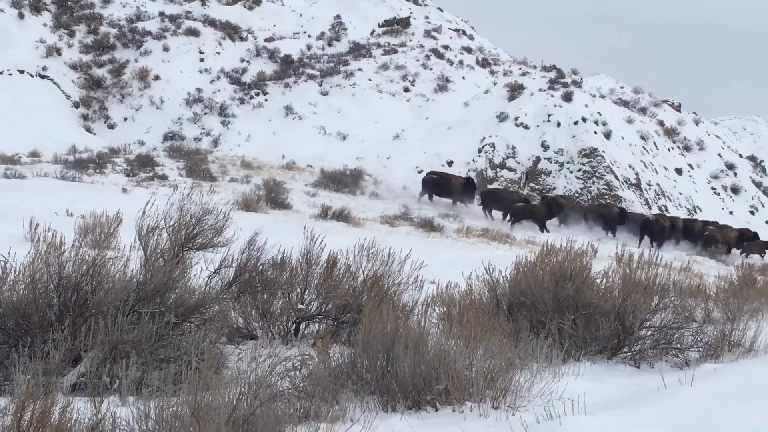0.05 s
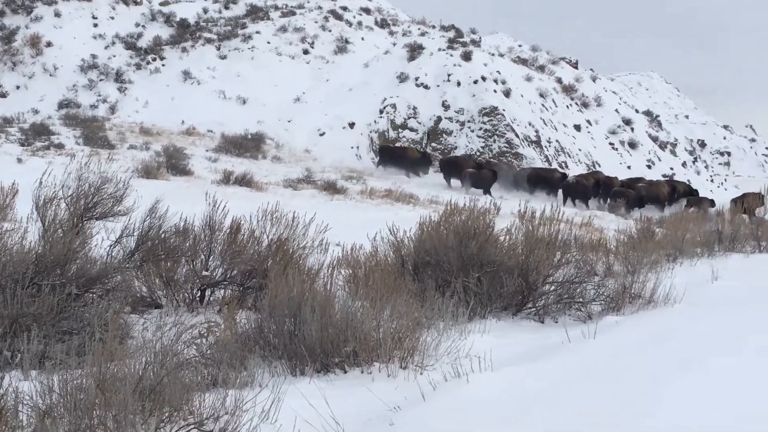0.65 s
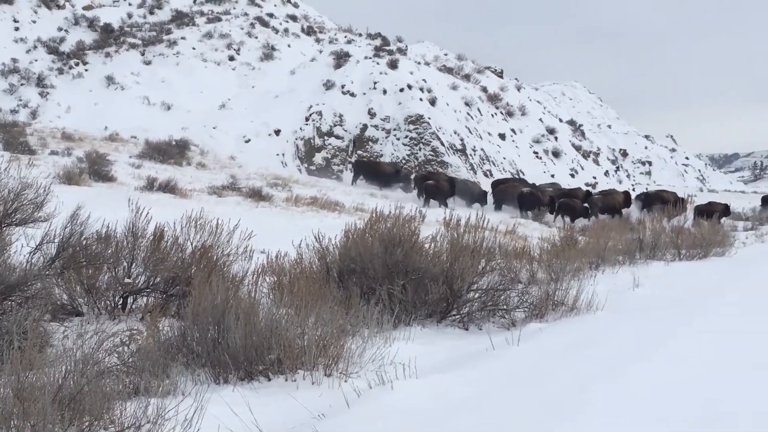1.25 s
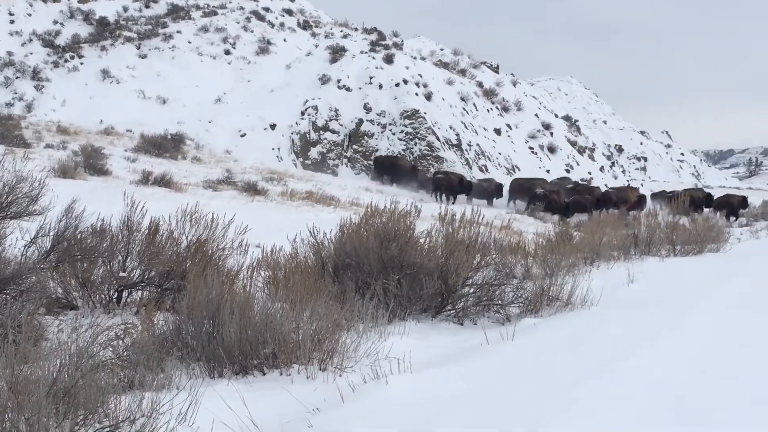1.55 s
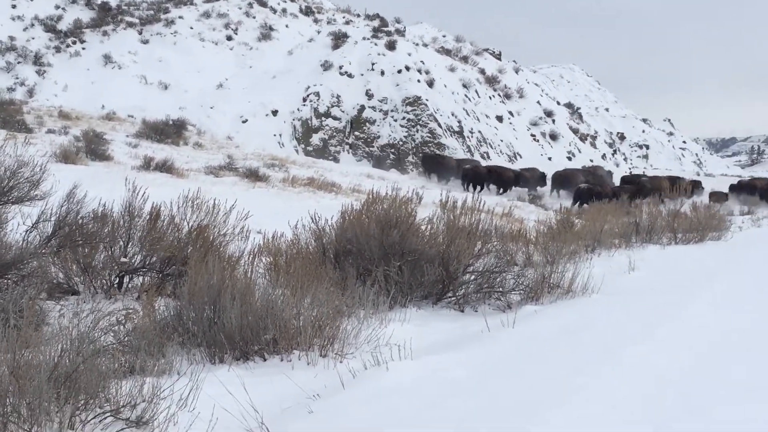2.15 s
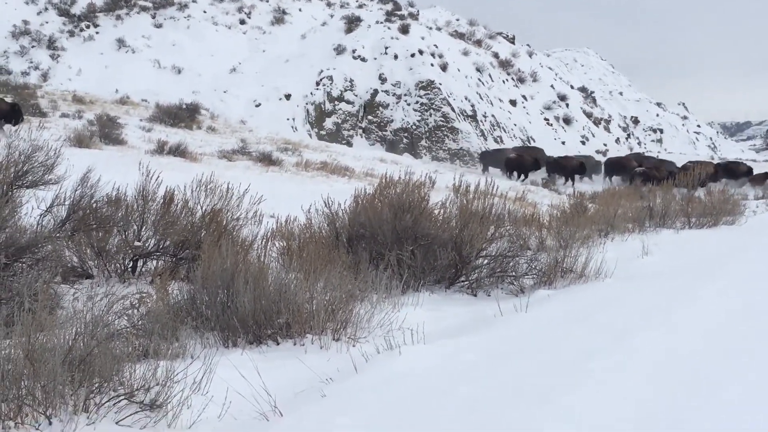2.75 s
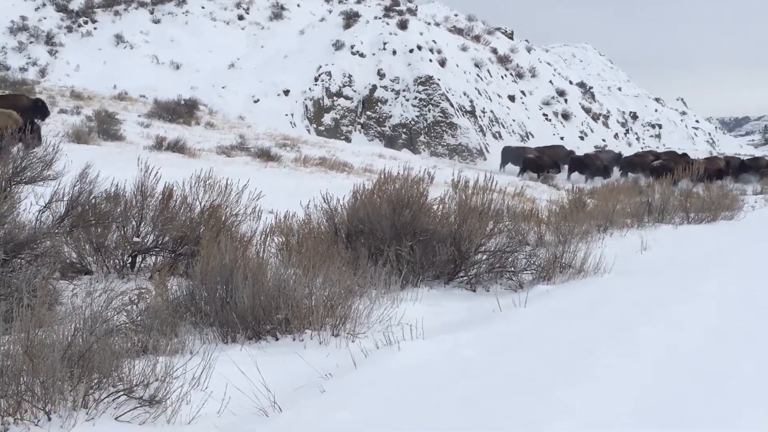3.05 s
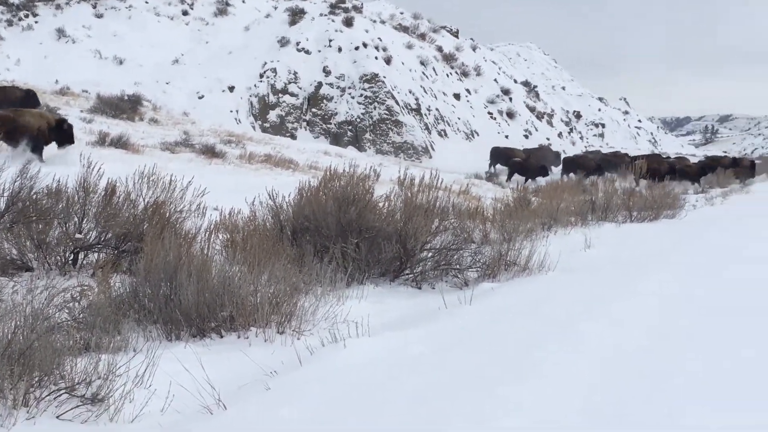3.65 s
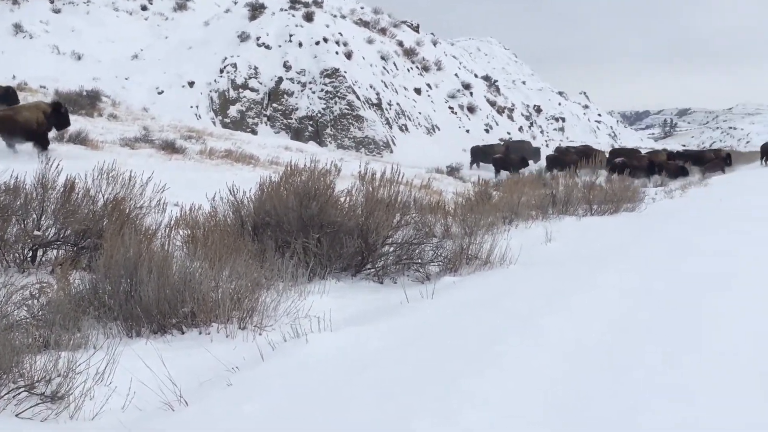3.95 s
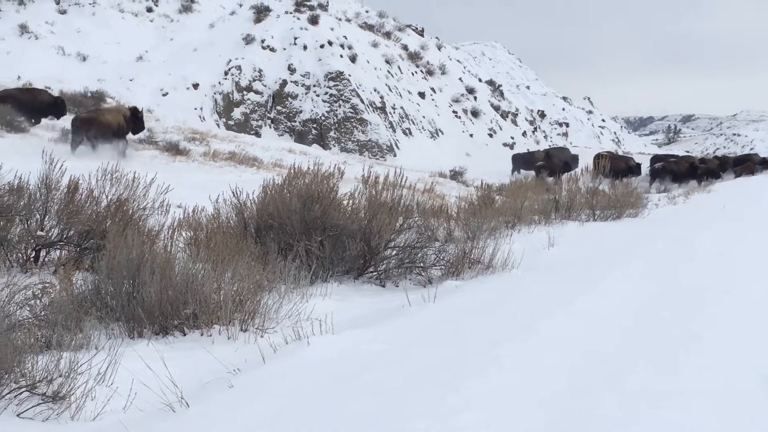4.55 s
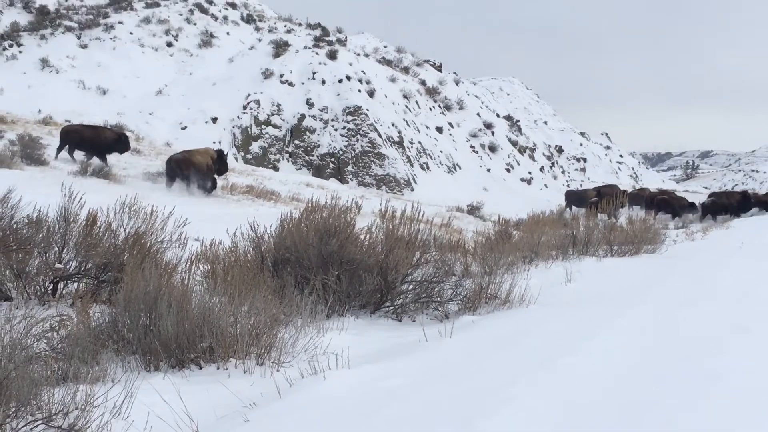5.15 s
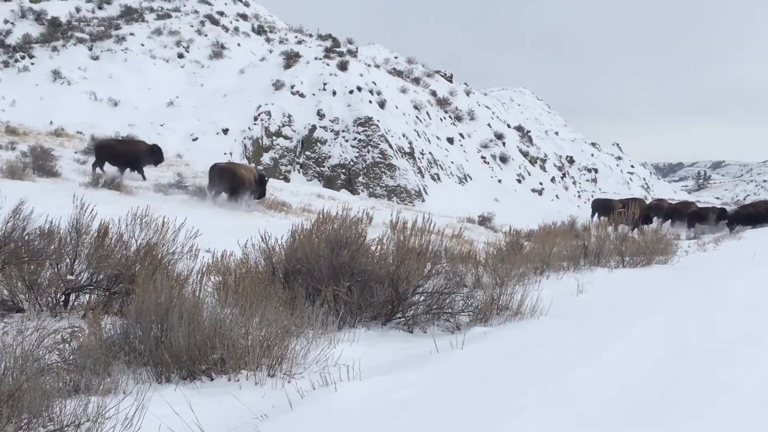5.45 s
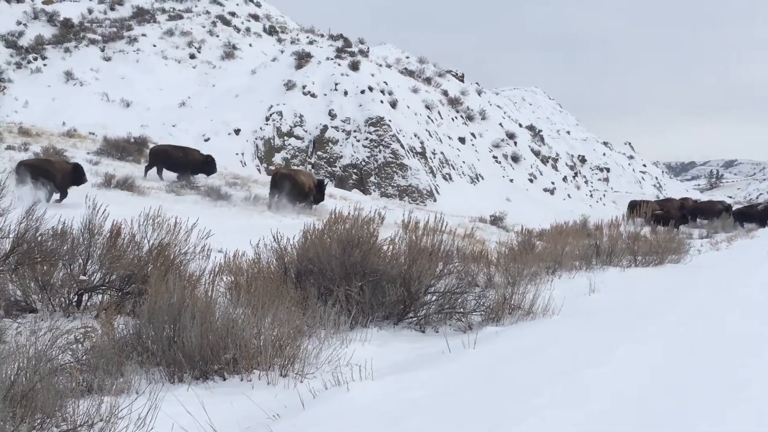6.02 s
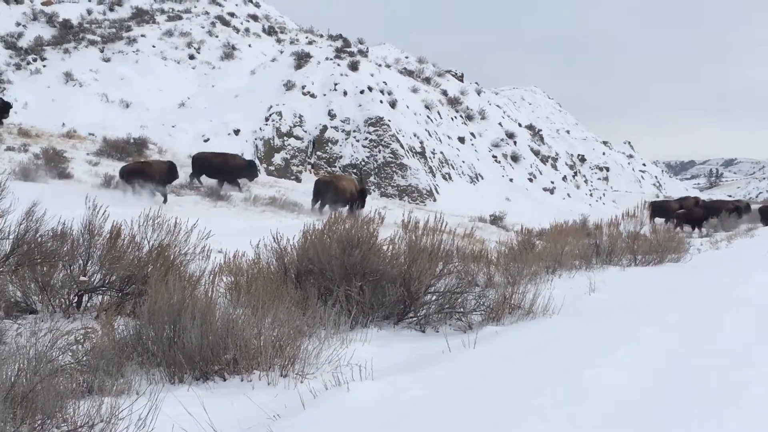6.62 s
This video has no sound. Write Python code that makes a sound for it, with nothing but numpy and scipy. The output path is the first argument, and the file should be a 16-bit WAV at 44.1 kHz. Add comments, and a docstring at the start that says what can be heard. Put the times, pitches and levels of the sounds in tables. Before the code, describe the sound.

Light wind buffets a hand-held microphone on an open snowy hillside for about seven seconds, a low, lumpy rumble with brief soft thumps and short lulls. Far quieter beneath it run an even hiss, a fine crackle of snow crust and twigs, and the dull hum of a vehicle idling nearby. From the start to about 2.4 seconds, a winter jacket swishes close to the microphone, with thin, bright ticks of fabric and zip and slight scuffs of the grip. From about 3.2 seconds, small snaps of dry stems come more often. The strongest gust arrives near 4.9 seconds. From about 5.6 seconds the treble turns slightly hollow as a finger nears the microphone, and the fabric ticks return, with the sharpest at about 6.7 seconds. The wind carries on to the end, and nothing echoes.

```python
"""Light wind on a snowy hillside buffets a hand-held microphone from the start, each eddy one low pressure
swing. Beneath it the slope hisses, crust and twigs crackle and a vehicle idles faintly close by.
For the first 2.4 s winter clothing often swishes and ticks by stick-slip friction. From 3.2 s dry stems
snap more often, and near 4.9 s the strongest gust arrives. From 5.6 s a finger slides up to the
microphone port and colours the treble; the sharpest tick falls near 6.7 s. The soft snow gives no echo."""
import sys
import numpy as np
from scipy import signal
from scipy.fft import rfft, irfft, next_fast_len
from scipy.io import wavfile
from scipy.ndimage import uniform_filter1d

SR = 44100
rng = np.random.default_rng(int(sys.argv[2]) if len(sys.argv) > 2 else 0)


def unload_wav(signal):
    """Save mono or channel-first audio to the path in sys.argv[1] as 16-bit WAV at rate SR, clipped to [-1, 1]."""
    wavfile.write(
        sys.argv[1],
        SR,
        np.round(np.clip(np.atleast_2d(signal).T, -1, 1) * 32767).astype(np.int16),
    )


N = 303408

# Levels in all tables are relative: each source applies its own gain.
# Spectra of the slope's hiss, the engine's drone, the sleeve's swish and scrape, and the wind's rumble.
# Each row: frequency in Hz, spectral density in dB.
HISS_SPECTRUM = [(300, 8.5), (550, 3.5), (760, -2.5), (1150, -0.5), (1500, -2.5), (1950, -3.5), (2400, -10),
                 (2900, -19), (3600, -16.5), (5000, -21.5), (9000, -21), (16000, -26.5)]
DRONE_SPECTRUM = [(60, 8.5), (150, -9), (240, 0.5), (300, -5.5), (380, -6.5), (450, -28), (600, -17.5),
                  (900, -32.5)]
SWISH_SPECTRUM = [(3500, -26), (5000, -12.5), (6700, -1.5), (9300, -1.5), (11700, -4), (13500, -6),
                  (15500, -9)]
SCRAPE_SPECTRUM = [(2000, -17), (2800, -11), (3300, -2), (4200, -14.5), (5000, -8), (7000, -9)]
RUMBLE_SPECTRUM = [(15, -36), (28, -18.5), (42, 1.4), (56, 4.5), (80, -3), (110, -5), (160, -16.5),
                   (250, -36.5), (400, -35.5), (1000, -62)]
# Course of the slope's hiss. Each row: time in seconds, level in dB.
HISS_LEVEL = [(0, -62), (.6, -61), (.95, -59.5), (1.5, -61), (2.3, -62.5), (2.55, -61), (2.9, -62.5),
              (3.6, -60.5), (4.3, -62.5), (5.5, -63), (6.1, -63.5), (6.88, -62.5)]
# Spectral lines of the engine and its fan. Each row: frequency in Hz, level in dB, line width in Hz.
HUM_LINES = [(284.8, -58, 7.6), (556, -76.5, 13), (665, -73, 13), (876, -80.5, 14), (948, -80.5, 14),
             (1140, -78.5, 16), (1231, -79.5, 14), (1840, -80.5, 18)]
# The hum fades and returns. Each row: time in seconds, gain in dB.
HUM_LEVEL = [(0, -2.5), (.2, -14.5), (.4, 0.5), (1.55, -4), (1.73, -6), (1.9, 0), (4.3, 1), (4.8, -1.5),
             (5.2, 0.5), (5.7, 0), (6.1, -1.5), (6.3, 1.5), (6.88, 1.5)]
# Snaps of dry stems and, at 6.676 s, the lower body of the loud fabric tick.
# Each row: start in seconds, crack level in dB, crack centre in Hz, knock level in dB.
SNAPS = [(0.071, -47.5, 1500, -43), (0.597, -45, 1800, -46), (1.791, -55, 3200, -56),
         (2.035, -49, 2000, -42), (3.222, -51, 2400, -50), (3.226, -55, 1600, -45), (3.263, -56, 2900, -58),
         (3.501, -51, 1600, -47), (3.6982, -42.5, 3620, -43.5), (3.755, -46.5, 2860, -48),
         (3.894, -56, 4200, -62), (4.144, -53, 2690, -52), (4.236, -52, 2300, -50), (4.591, -50, 4000, -58),
         (4.657, -51, 2300, -60), (4.747, -47.5, 2200, -52), (4.904, -47, 2060, -52),
         (5.071, -52, 2300, -49), (5.159, -46, 1900, -54), (5.386, -51.5, 2400, -60),
         (5.607, -50, 2570, -58), (5.625, -51.5, 4200, -64), (5.689, -48, 2080, -55),
         (5.726, -62, 3800, -67), (5.831, -48, 1600, -47), (6.192, -52, 2400, -61), (6.349, -52, 2200, -55),
         (6.556, -53, 1400, -44), (6.676, -42, 3500, -50), (6.793, -55.5, 3800, -68)]
# Modes of a typical stem. Each row: frequency in Hz, level in dB, 60 dB decay time in seconds.
STEM_MODES = [(730, -3, 0.011), (1320, -3, 0.017), (2000, -7, 0.011)]
# Scuffs of the grip. Each row: middle in seconds, level in dB, length in seconds, centre in Hz,
# bandwidth in octaves.
SCUFFS = [(0.1, -57, 0.02, 517, 1.0), (0.625, -65, 0.068, 1690, 0.39), (0.959, -67.5, 0.045, 3500, 0.59),
          (1.648, -70, 0.043, 3300, 0.5), (2.037, -58, 0.013, 1250, 1), (3.508, -65, 0.017, 1250, 0.89),
          (3.59, -71, 0.09, 2600, 0.83), (4.071, -74, 0.14, 3360, 0.37), (4.594, -60, 0.025, 1550, 0.45),
          (4.587, -65.5, 0.039, 4700, 0.92), (5.276, -59, 0.0095, 980, 0.45),
          (6.345, -60, 0.022, 1000, 0.9), (6.702, -54, 0.012, 820, 0.7), (6.73, -57.5, 0.04, 905, 0.67)]
# Faint rustle of a jacket that never quite rests. Each row: time in seconds, level in dB.
RUSTLE_LEVEL = [(0, -74), (.7, -74), (1.5, -76), (2.2, -73), (2.7, -78.5), (4.1, -76), (4.35, -80.5),
                (5.9, -80), (6.2, -73), (6.88, -78)]
# Sleeve strokes. Each row: start in seconds, length in seconds, level in dB, brightness in dB.
STROKES = [(0.304, 0.1, -64.5, -11), (0.527, 0.2, -62, -10), (0.7, 0.015, -73, 1), (0.753, 0.13, -69, 2),
           (1.02, 0.11, -66.5, -0.5), (1.176, .03, -72, 6), (1.378, 0.023, -67, -2),
           (1.543, 0.025, -68.5, 3), (1.636, 0.028, -60, -1.5), (1.731, 0.068, -59.5, -0.5),
           (1.968, 0.08, -68, 1), (2.1, 0.15, -70, -3), (2.318, 0.011, -59, 1), (3.35, 0.04, -68, 3.5),
           (3.564, 0.125, -67, 0), (4.443, 0.12, -77, 9), (4.62, 0.15, -72, -1), (4.557, 0.046, -64.5, -8),
           (6.273, 0.024, -64, -12), (6.5, 0.04, -72, 0), (6.673, 0.021, -65, -1), (6.858, 0.04, -74, -1)]
# Ticks of fabric and zip. Each row: start in seconds, level in dB, centre in Hz, 60 dB decay in seconds.
TICKS = [(0.517, -37, 8930, 0.0081), (0.566, -37, 9450, .004), (0.5745, -26, 11800, 0.0042),
         (0.705, -42, 12000, .005), (0.775, -40, 11500, .005), (0.7925, -48, 9000, .004),
         (1.005, -48, 12000, .005), (1.03, -44, 10500, .008), (1.037, -47, 9000, .008),
         (1.072, -43, 11000, .02), (1.094, -44, 12000, .01), (1.384, -38.5, 9220, .008),
         (1.39, -40, 12000, .008), (1.545, -46, 10000, .02), (1.6355, -29, 6400, 0.0064),
         (1.7445, -35, 9800, .008), (1.762, -46, 12000, .004), (1.7867, -38, 7330, .025),
         (1.791, -35, 6500, .006), (2.1635, -44, 7630, .005), (2.2895, -46, 7000, .004),
         (2.3225, -40, 12500, .006), (2.3284, -30.5, 7600, .004), (3.5523, -41, 7000, .01),
         (5.1871, -41.5, 7850, 0.017), (5.406, -48, 12000, .015), (5.42, -50, 10000, .015),
         (5.5287, -43.5, 8480, 0.011), (6.0307, -38.5, 8760, .01), (6.081, -44.5, 8550, 0.03),
         (6.116, -45, 10500, .03), (6.2696, -47, 6700, .02), (6.279, -46, 8000, .015),
         (6.2916, -41.5, 7090, .02), (6.5, -53, 9000, .015), (6.573, -44, 8500, .006),
         (6.647, -36.5, 9820, .008), (6.6757, -24, 7600, 0.0097), (6.6784, -31, 8500, .005),
         (6.754, -43, 8950, .012), (6.8224, -46, 12000, .006), (6.8633, -43, 10000, .008)]
# Gusts over the steady wind. Each row: middle in seconds, level in dB, length in seconds.
GUSTS = [(0.254, -43.5, 0.53), (0.796, -39, 0.099), (1.304, -39.5, 0.083), (1.51, -39, 0.18),
         (1.79, -44.5, 0.093), (2.593, -39.5, 0.08), (3.003, -43.5, 0.22), (4.006, -39.5, 0.11),
         (4.906, -35, 0.17), (5.2, -39, 0.06), (6, -43.5, 0.32), (6.83, -39.5, 0.09)]
# Drops in the steady wind. Each row: middle in seconds, depth in dB, length in seconds.
LULLS = [(0.68, -13, 0.04), (1.102, -9, 0.15), (2.057, -12, 0.08), (3.17, -6.5, .14), (3.703, -1.5, 0.23),
         (4.228, -3, 0.032), (4.623, -8, 0.047), (4.758, -2, 0.054), (5.404, -7, 0.05), (6.39, -9, 0.2),
         (6.724, -9, 0.049)]
# The strongest eddies at the port. Each row: middle in seconds, level in dB, swing frequency in Hz.
EDDIES = [(0.015, -24.5, 64), (0.114, -34.5, 79), (0.168, -28, 60), (0.199, -33, 72.6), (0.243, -29.5, 67),
          (0.339, -30, 75.6), (0.765, -34, 63), (0.796, -40, 67), (1.303, -35, 66), (1.443, -29, 70),
          (1.492, -28.5, 76), (1.537, -24.5, 146), (1.556, -28.5, 81), (1.611, -36.5, 88.5),
          (1.775, -34, 79), (1.976, -33, 61.6), (2.147, -36, 69.4), (2.417, -30, 83), (2.589, -32, 83),
          (2.627, -28, 148), (2.905, -22.5, 74), (2.958, -37, 63), (3.063, -36, 83), (3.46, -34, 72),
          (3.989, -37, 77), (4.024, -32.5, 63), (4.142, -33.5, 140), (4.165, -24.5, 77.5),
          (4.269, -30.5, 70), (4.681, -34.5, 70), (4.824, -25, 60), (4.84, -35.5, 130), (4.865, -29, 70),
          (4.904, -22, 111), (4.991, -22, 54.4), (5.191, -28.5, 76), (5.28, -30, 97), (5.326, -28, 81.6),
          (5.748, -33, 92), (5.855, -33, 71), (5.889, -32.5, 72.5), (6.032, -32, 70.4), (6.064, -30.5, 84),
          (6.167, -34.5, 73.5), (6.752, -34.5, 80.6), (6.824, -29.5, 76)]
# Resonances and notches of the microphone port, and of the gap under a finger beside it.
# Each row: centre in Hz, bandwidth in Hz, gain in dB.
PORT_RESONANCES = [(4030, 710, 2.5), (5030, 410, -3.5), (7200, 280, -1), (7600, 1200, -2.5), (9500, 580, 0),
                   (10570, 770, -6), (10830, 610, 2), (11200, 760, 0), (15200, 830, 0.5)]
GAP_RESONANCES = [(2390, 230, 3.5), (4440, 430, 2.5), (5980, 680, -13), (7350, 550, 8.5), (8060, 700, -10),
                  (9400, 640, 7), (10400, 1600, -10), (11800, 500, 4), (15200, 7100, -3.5)]
# The finger nears the port. Each row: time in seconds, closeness from 0 to 1.
FINGER_CLOSENESS = [(0, 0.06), (5.6, 0.08), (6.05, 0.4), (6.6, 0.7), (6.88, 0.7)]


def from_db(db):
    """Amplitude ratio: tenfold for every 20 dB."""
    return 10 ** (np.asarray(db) / 20)


def rms_one(x):
    """Normalisation to unit rms."""
    return x / np.sqrt(np.mean(x ** 2) + 1e-20)


def in_time(rows):
    """Linear interpolation of (seconds, value) rows at every sample."""
    return np.interp(np.arange(N) / SR, *np.transpose(rows))


def swell(s, length):
    """Gaussian envelope of height 1 around time s."""
    return np.exp(-2 * np.minimum(((np.arange(N) / SR - s) / length) ** 2, 20))


def drift(rate_hz):
    """Slow random modulation: low-passed noise of unit rms."""
    step, settle = 40, 2000   # samples per point; points discarded while the filter settles
    pole = np.exp(-2 * np.pi * rate_hz * step / SR)
    noise = rng.standard_normal(N // step + settle + 2)
    slow = signal.lfilter([1], [1, -2 * pole, pole * pole], noise)[settle:]
    return np.interp(np.arange(N) / step, np.arange(len(slow)), rms_one(slow))


def colour(x, spectrum):
    """Spectral shaping of a steady signal, to unit rms."""
    hz, db = np.transpose(spectrum)
    size = next_fast_len(N)
    bins_hz = np.maximum(np.arange(size // 2 + 1) * SR / size, 1)
    gain = from_db(np.interp(np.log(bins_hz), np.log(hz), db, left=-90, right=-90))
    return rms_one(irfft(rfft(x, size) * gain, size)[:N])


def band(x, hz, octaves, order=2):
    """Causal band-pass filtering around a centre frequency."""
    edges = np.clip([hz / 2 ** (octaves / 2), hz * 2 ** (octaves / 2)], 10, .45 * SR)
    return signal.sosfilt(signal.butter(order, edges, "band", fs=SR, output="sos"), x)


def ring(x, hz, t60):
    """Damped oscillator: a unit impulse excites a decaying sine of height 1."""
    radius, angle = from_db(-60 / (t60 * SR)), 2 * np.pi * hz / SR
    return signal.lfilter([0, np.sin(angle)], [1, -2 * radius * np.cos(angle), radius ** 2], x + 1e-18)


def equalise(x, peaks):
    """Resonances and notches in series: their responses multiply."""
    for hz, width_hz, db in peaks:
        x = x + (from_db(db) - 1) * signal.lfilter(*signal.iirpeak(hz, hz / width_hz, fs=SR), x)
    return x


def add(out, s, sound):
    """Superposition of a sound on the output from time s."""
    start = int(round(s * SR))
    first, last = max(start, 0), min(start + len(sound), N)
    if last > first:
        out[first:last] += sound[first - start:last - start]


def impulses(per_s, spread_db, max_spreads):
    """Poisson process: independent impulses of uneven size and either sign."""
    sizes = from_db(spread_db * np.minimum(rng.exponential(1, N), max_spreads))
    return sizes * rng.choice([-1, 1], N) * (rng.random(N) < per_s / SR)


def friction(per_s, spread_db, grain_gain):
    """Stick-slip friction: fibres catch and let go, adding grains to a smooth hiss."""
    return grain_gain * rms_one(impulses(per_s, spread_db, max_spreads=4)) + rng.standard_normal(N)


def clicks(rows, gain_db, octaves, strike_db, tail_db, tail_t60, order):
    """Sudden release of stress: a sharp impulse, a decaying crack and a faint slither after it."""
    out, t = np.zeros(N), np.arange(SR // 10) / SR
    for s, db, hz, t60 in rows:
        decay = from_db(-60 * t / t60) + from_db(tail_db - 60 * t / tail_t60)
        force = np.sign(rng.standard_normal(len(t))) * decay
        force[0] = from_db(strike_db)
        crack = band(force, hz, octaves, order)
        peak_rms = np.sqrt(uniform_filter1d(crack ** 2, size=44, mode="constant").max())   # over 1 ms
        add(out, s, from_db(db + gain_db) * crack / peak_rms)
    return out


def slope_hiss(gain_db=2.0):
    """Broadband noise: the open slope and its dry brush give an even, finely grained hiss."""
    hiss = colour(friction(per_s=250, spread_db=2.5, grain_gain=0.49), HISS_SPECTRUM)
    return from_db(in_time(HISS_LEVEL) + gain_db) * hiss


def engine(drone_db=-52.0, drone_waver_db=1.2, hum_db=1.24, hum_waver_db=1.86, speed_wobble=0.00402):
    """Random modulation broadens the fan and belt lines over the dull drone of an idling engine."""
    running_time = np.cumsum(1 + speed_wobble * drift(4.01)) / SR   # the speed hunts a little
    hum = np.zeros(N)
    for hz, db, width_hz in HUM_LINES:
        sway = 1 + 1.15 * (drift(width_hz) + 1j * drift(width_hz))   # in amplitude and phase
        hum += from_db(db) * rms_one(np.real(sway * np.exp(2j * np.pi * hz * running_time)))
    drone = from_db(drone_db + drone_waver_db * drift(4.3)) * colour(rng.standard_normal(N), DRONE_SPECTRUM)
    return drone + from_db(hum_db + in_time(HUM_LEVEL) + hum_waver_db * drift(14)) * hum


def crust_crackle(rms_db=-71.5, low_hz=750, high_hz=4200, per_octave_db=-4.0, cycles=8.5):
    """Impulse excitation: each tiny break in crust or twig rings a few cycles; the higher, the fainter."""
    breaks = impulses(per_s=110, spread_db=2.5, max_spreads=3)
    pitches = np.geomspace(low_hz, high_hz, 16)
    pitch_index = rng.integers(0, len(pitches), N)
    grains = np.zeros(N)
    for k, hz in enumerate(pitches):
        gain = from_db(per_octave_db * np.log2(hz / low_hz))
        grains += gain * ring(breaks * (pitch_index == k), hz, t60=cycles / hz)
    return from_db(rms_db) * rms_one(band(grains, np.sqrt(low_hz * high_hz), octaves=2.8))


def snaps(crack_t60=0.0067, typical_crack_hz=2200, pitch_exponent=0.54, spread_octaves=0.13):
    """Modal ringing: a crack over a woody knock makes each stem's snap and the loud tick's lower body."""
    cracks = [(s, db, hz, crack_t60) for s, db, hz, _ in SNAPS]
    out = clicks(cracks, gain_db=-6.5, octaves=0.88, strike_db=5.5, tail_db=-16, tail_t60=0.046, order=2)
    impulse = signal.unit_impulse(SR // 20)
    for s, _, crack_hz, knock_db in SNAPS:
        detune = 2 ** (spread_octaves * rng.uniform(-1.2, 1))
        pitch = (crack_hz / typical_crack_hz) ** pitch_exponent * detune   # thin stems sound higher
        knock = sum(from_db(db) * ring(impulse, hz * pitch, t60) for hz, db, t60 in STEM_MODES)
        add(out, s, -from_db(knock_db) * knock)   # inverted so that it adds to the crack: a full snap
    return out


def grip_scuffs(rough_db=2.5, rough_hz=90):
    """Sliding friction: the shifting grip gives short swells of rough, stuttering noise."""
    out, t = np.zeros(N), np.arange(-SR // 5, SR // 5) / SR
    for s, db, length, hz, octaves in SCUFFS:
        rubbing = rms_one(band(rng.standard_normal(len(t)), hz, octaves))
        add(out, s + t[0], from_db(db) * np.exp(-2 * (t / length) ** 2) * rubbing)
    return out * rms_one(from_db(rough_db * drift(rough_hz)))


def crinkle(x, depth_db=3.0, rate_hz=35):
    """Amplitude modulation: folds catch one after another, so each treble band flickers on its own."""
    out = np.zeros(N)
    for hz in np.geomspace(5000, 13000, 6):
        low = signal.sosfiltfilt(signal.butter(4, hz, fs=SR, output="sos"), x)
        out += low * from_db(depth_db * drift(rate_hz))
        x = x - low
    return rms_one(out + x * from_db(depth_db * drift(rate_hz)))


def sleeve_power(attack_s=0.012, release_s=0.022, arch_db=3, rest_bright_db=-6.0):
    """Incoherent sounds add in power: rustle plus strokes, for the body and the top of the swish."""
    t = np.arange(N) / SR
    power = from_db(in_time(RUSTLE_LEVEL)) ** 2
    top_power = power * from_db(rest_bright_db) ** 2
    for s, length, db, brightness_db in STROKES:
        fade = np.maximum((s - t) / attack_s, (t - s - length) / release_s)
        arch = np.sin(np.pi * np.clip((t - s) / length, 0, 1))   # loudest in mid-stroke
        stroke = from_db(db + arch_db * (arch - 1.5)) * np.exp(-np.clip(fade, 0, 20))
        power += stroke ** 2
        top_power += (from_db(brightness_db) * stroke) ** 2
    return power, top_power


def sleeve(top_hz=10300, top_db=3.0, scrape_db=-3.5, scrape_exponent=0.51, flicker_db=2.0):
    """Friction of shell fabric: a swish, brighter on light strokes, and a scrape that grows with it."""
    power, top_power = sleeve_power()
    fibres = crinkle(colour(friction(per_s=520, spread_db=2.0, grain_gain=0.84), SWISH_SPECTRUM))
    body = signal.sosfiltfilt(signal.butter(3, top_hz, fs=SR, output="sos"), fibres)
    swish = np.sqrt(power) * body + from_db(top_db) * np.sqrt(top_power) * (fibres - body)
    scrape_level = np.sqrt(power.mean() * (power / power.mean()) ** scrape_exponent)
    scrape = scrape_level * colour(friction(per_s=370, spread_db=1.5, grain_gain=0.72), SCRAPE_SPECTRUM)
    return (swish + from_db(scrape_db) * scrape) * from_db(flicker_db * drift(24.0))


def fabric_ticks(faint_per_s=3, faint_hz=8200, faint_t60=0.25):
    """Transients: stiff fabric and zip catch and release, with fainter ticks at random times."""
    faint = []
    for when, size, pitch in rng.random((int(faint_per_s * N / SR), 3)):
        relative_db = -54 + 2.5 * (2 * size - 1)
        hz = faint_hz * 2 ** (0.7 * (2 * pitch - 1))   # within 0.7 octave either way
        faint.append((when * N / SR, relative_db, hz, faint_t60))
    rows = TICKS + faint
    return clicks(rows, gain_db=-14.0, octaves=0.7, strike_db=4.0, tail_db=-21, tail_t60=.08, order=1)


def wind_rumble(steady_db=-45, gain_db=1.5, lumpy_db=3.0, lumps_hz=13, power_floor=0.077):
    """Turbulent pressure at the port: a lumpy rumble that follows the gusts and lulls."""
    lull_db = sum(db * swell(s, length) for s, db, length in LULLS)
    gust_power = sum((from_db(db) * swell(s, length)) ** 2 for s, db, length in GUSTS)
    power = from_db(steady_db + lull_db) ** 2 + gust_power
    flow = colour(rng.standard_normal(N), RUMBLE_SPECTRUM)
    flow /= np.sqrt(uniform_filter1d(flow ** 2, size=3000) + power_floor)   # evens out chance swells
    lumps = drift(lumps_hz)
    lumps = rms_one(lumps - uniform_filter1d(lumps, size=8000))
    return np.sqrt(power) * from_db(gain_db + lumpy_db * np.minimum(lumps, 2)) * flow


def wind_eddies(swing_db=2.5, width_cycles=0.44, flutter_db=-23.5, flutter_s=0.012, per_octave_db=8.0):
    """A passing vortex is one brief pressure swing; the faster it is, the more it breaks into flutter."""
    out, t = np.zeros(N), np.arange(-SR // 20, SR // 20) / SR
    median_hz = np.median([hz for _, _, hz in EDDIES])
    for s, db, hz in EDDIES:
        cycles = t * hz
        phase = cycles - .1 * cycles ** 2 + rng.random()   # the swing slows as it passes
        swing = np.exp(-.5 * (cycles / width_cycles) ** 2) * np.cos(2 * np.pi * phase)
        flutter_hz = 185 * (hz / median_hz) ** 0.4
        noise = rms_one(band(rng.standard_normal(len(t)), flutter_hz, octaves=0.87, order=3))
        flutter = np.exp(-.5 * (t / flutter_s) ** 2) * noise
        breakup_db = flutter_db + per_octave_db * np.log2(hz / median_hz)
        add(out, s + t[0], from_db(db + swing_db) * swing + from_db(db + breakup_db) * flutter)
    return out


def scene():
    """Superposition in a free field: all sources meet at one microphone, without echo."""
    hillside = slope_hiss() + engine() + crust_crackle() + snaps()
    handling = grip_scuffs() + sleeve() + fabric_ticks()
    return (hillside + handling + wind_rumble() + wind_eddies())[None]


def record(dry, cutoff_hz=16000):
    """Cavity resonance: the port ripples the treble, more so beside a finger; the top is cut steeply."""
    closeness = in_time(FINGER_CLOSENESS)
    open_port = equalise(dry, PORT_RESONANCES)
    heard = (1 - closeness) * open_port + closeness * equalise(open_port, GAP_RESONANCES)
    return signal.sosfilt(signal.ellip(12, .1, 80, cutoff_hz, fs=SR, output="sos"), heard)


dry = scene()
out = record(dry)
unload_wav(out)
```